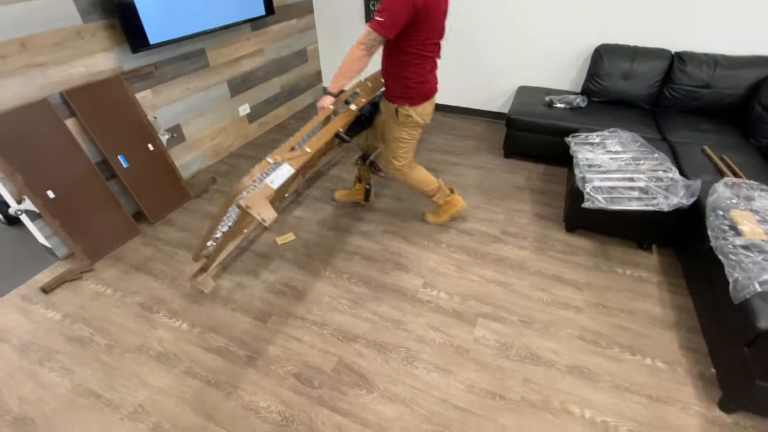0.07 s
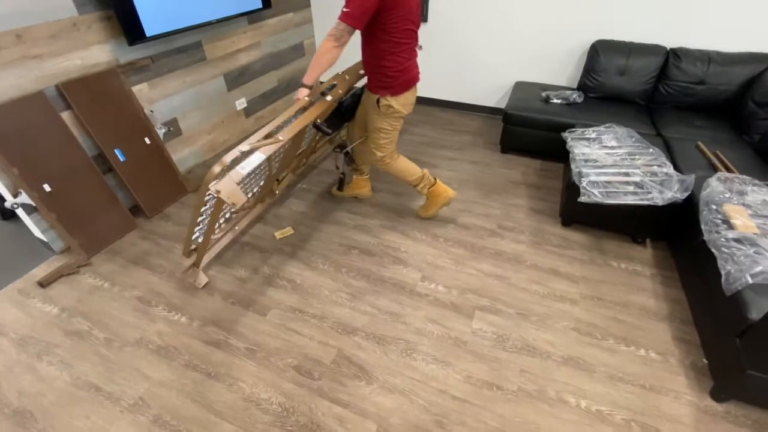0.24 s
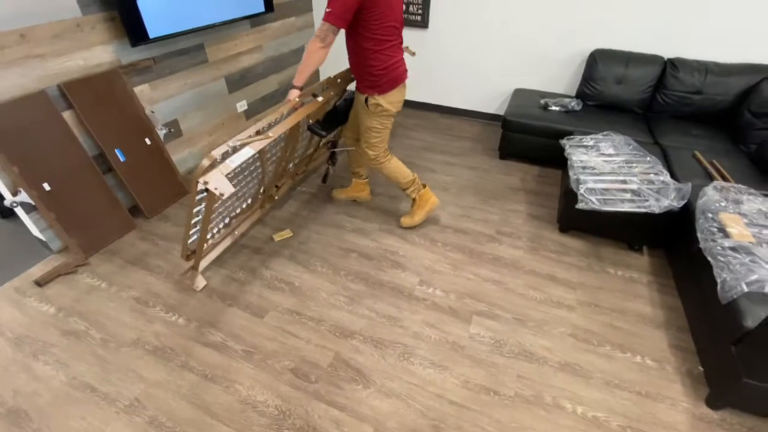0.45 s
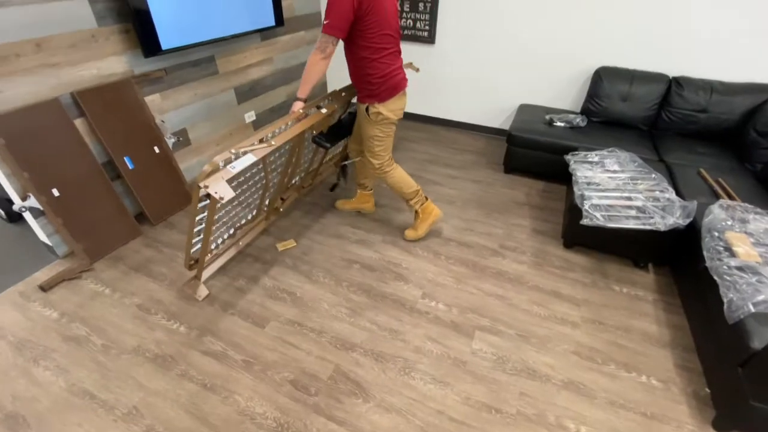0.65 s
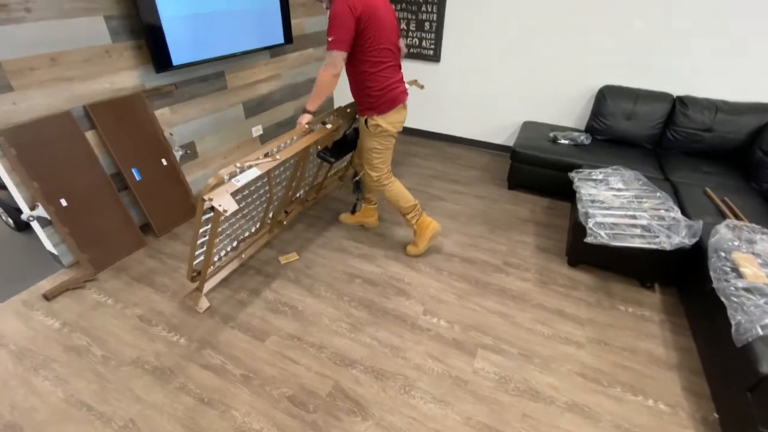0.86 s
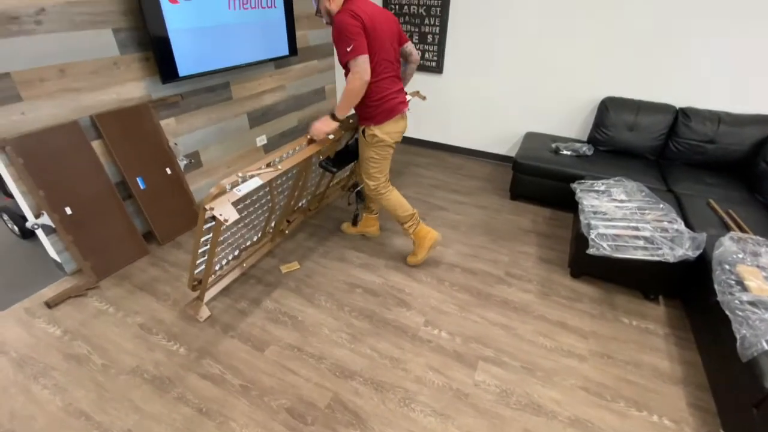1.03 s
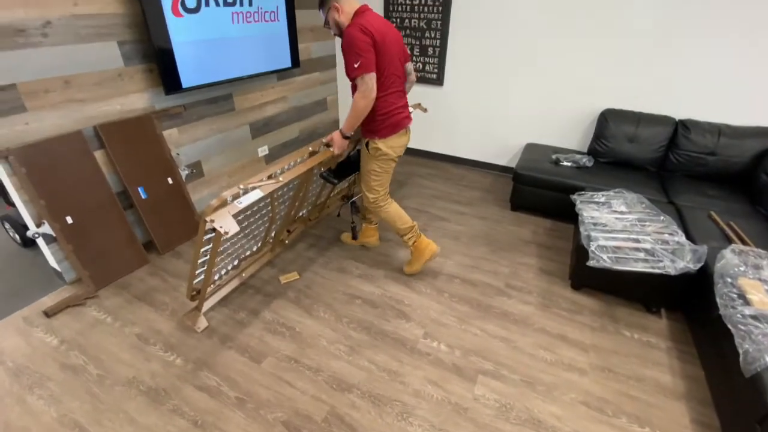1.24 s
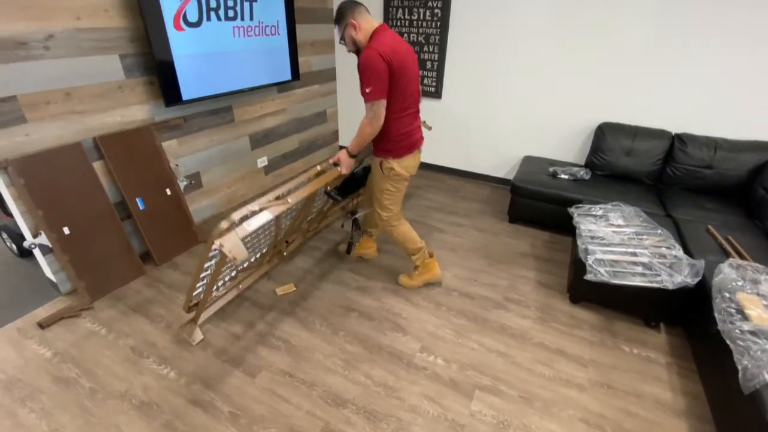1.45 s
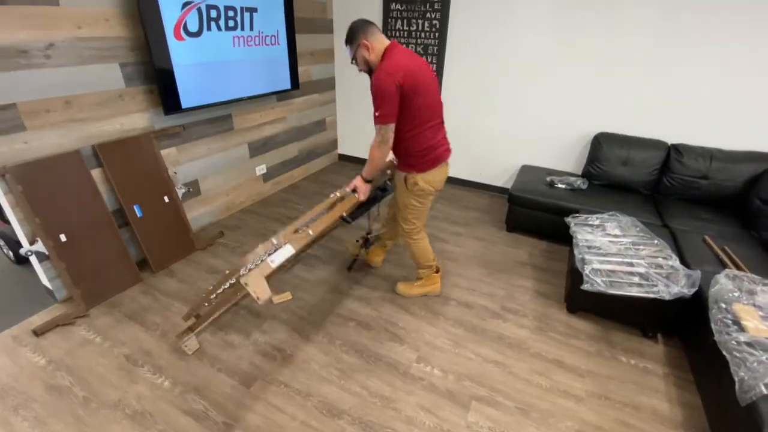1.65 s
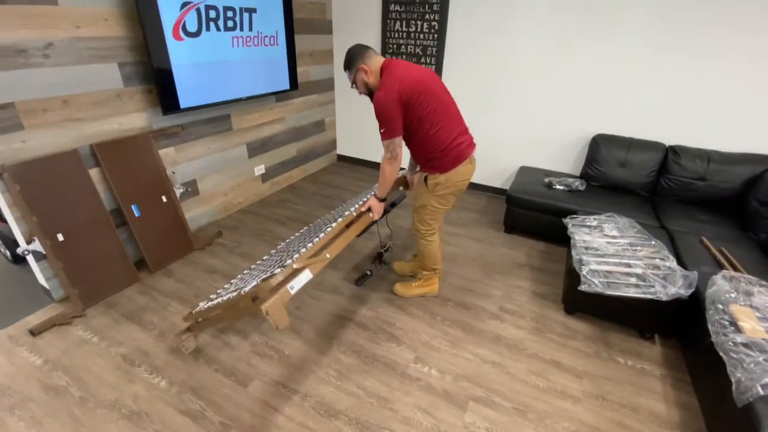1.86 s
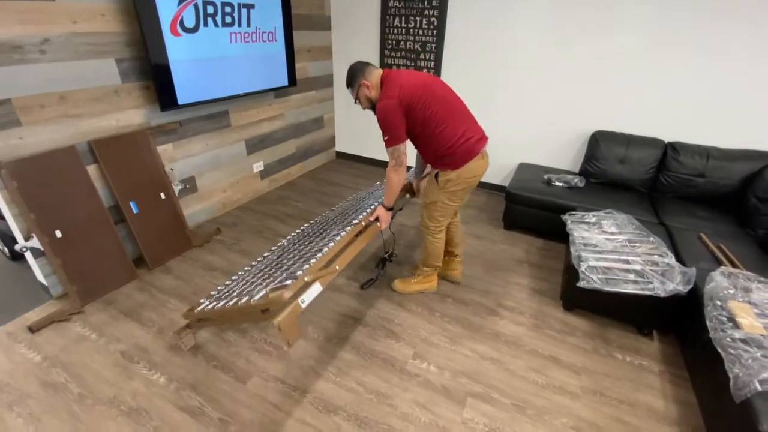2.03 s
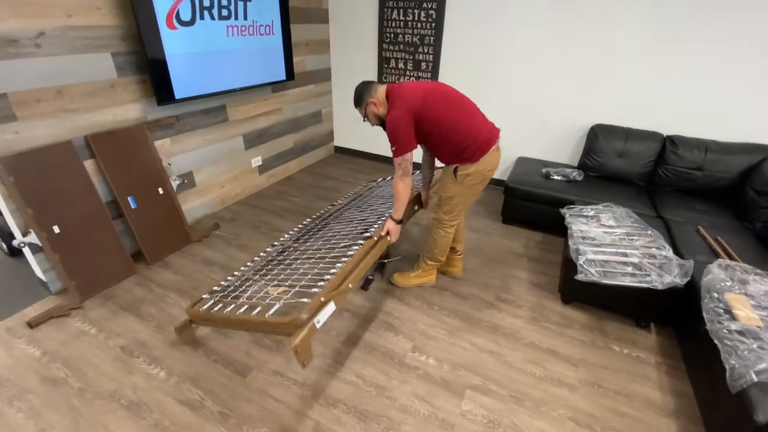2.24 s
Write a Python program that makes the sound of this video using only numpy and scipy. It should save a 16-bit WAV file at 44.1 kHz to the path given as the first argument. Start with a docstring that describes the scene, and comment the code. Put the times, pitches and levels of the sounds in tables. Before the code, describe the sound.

A metal bed frame clanks and its wire springs rattle as it is tipped and lowered.

```python
"""A metal bed frame with a wire spring deck is moved in a hard-floored room, over a ventilation rumble.
It is tipped up on its edge: loose parts clash in short bursts, ringing the steel tubes and the wire deck,
and dull knocks reach the floor. Around one second the deck rattles on softly. From about 1.4 s the frame
is lowered in a second run of clashes and knocks, and the rattle dies down.
Heard by a phone a few metres off."""
import sys
import numpy as np
from scipy import signal
from scipy.fft import rfft, irfft
from scipy.io import wavfile
from scipy.ndimage import uniform_filter1d

SR = 44100
rng = np.random.default_rng(int(sys.argv[2]) if len(sys.argv) > 2 else 0)


def materialize(psi):
    """Save the field psi as 16-bit PCM at rate SR to the path in sys.argv[1].

    A 1-D psi becomes a single channel; in a 2-D psi each row is a channel.
    """
    bounded = np.clip(np.atleast_2d(psi).T, -1, 1)
    quanta = np.round(bounded * 32767).astype(np.int16)
    wavfile.write(sys.argv[1], SR, quanta)


N = 101429
MOVE_S = .12  # the moving frame gets a new pattern of wire modes and echoes this often


def undb(db):
    """dB to gain."""
    return 10 ** (np.asarray(db) / 20)


def unit(x):
    """Scale to rms 1."""
    return x / np.sqrt(np.mean(x ** 2))


def colour(x, curve, tilt_db=0):
    """EQ by a (freq_hz, gain_db) curve, tilted by tilt_db per octave about 2.5 kHz."""
    hz = np.maximum(np.arange(len(x) // 2 + 1) * SR / len(x), 10)
    curve_hz, curve_db = np.array(curve).T
    gain_db = np.interp(np.log(hz), np.log(curve_hz), curve_db) + tilt_db * np.log2(hz / 2500)
    return irfft(rfft(x) * undb(gain_db), len(x))


def band(x, lo_hz, hi_hz):
    """Band-pass."""
    return signal.sosfilt(signal.butter(2, [lo_hz, hi_hz], "band", fs=SR, output="sos"), x)


def fade(t, t60):
    """Exponential decay, 60 dB in t60 seconds."""
    return np.exp(-np.log(1000) * t / t60)


def wander(per_s):
    """Slow random drift, rms 1."""
    step = int(SR / per_s)
    return unit(uniform_filter1d(np.repeat(rng.standard_normal(N // step + 1), step), step)[:N])


def add(out, x, start_s):
    """Mix x in at start_s."""
    i = int(start_s * SR)
    out[i:i + len(x)] += x[:N - i]


def positions():
    """Overlapping crossfades, one for each position of the moving frame."""
    t = np.arange(N) / SR
    return [np.clip(1 - abs(t - s) / MOVE_S, 0, 1) for s in np.arange(0, N / SR + MOVE_S, MOVE_S)]


# Tone of the ventilation: freq_hz, gain_db
VENT_EQ = [(15, -33), (25, -4), (81, -2.5), (137, -9), (250, -4), (433, -15), (658, -24.5), (731, -18),
           (1650, -29), (1830, -23.5), (2140, -32), (9750, -42.5), (13000, -48)]
# Its stereo width: freq_hz, side_over_mid_db
VENT_WIDTH = [(60, -14), (110, -7.5), (200, -12), (380, -2.5), (700, -0.5), (1290, -2), (2380, 6),
              (4400, -3), (8120, -2), (15000, 1)]


def ventilation():
    """Steady air rumble and room hush, leaning slightly right."""
    mid, side = (colour(band(rng.standard_normal(N), 44, 22000), VENT_EQ) for _ in range(2))
    side = colour(side, VENT_WIDTH)
    return undb(-56) / np.std(mid) * np.array([mid + side, mid - side]) * undb([[-1], [1]])


def room(x):
    """Diffuse echoes, mono in the bass, treble dying first; the pattern shifts as the frame moves."""
    out, t = np.zeros((2, N)), np.arange(SR * 3 // 4) / SR
    for crossfade in positions():
        send = x * crossfade ** 1.045
        noise = rng.standard_normal((3, len(t))) * (t > .003)  # 3 ms pre-delay
        bass = band(noise[0], 110, 460) * fade(t, t60=.28)
        for channel in range(2):
            mids = band(noise[channel + 1], 476, 3100) * fade(t, t60=.34)
            treble = band(noise[channel + 1], 4500, 20200) * fade(t, t60=.24)
            tail = bass + mids - treble
            out[channel] += signal.fftconvolve(send, tail / np.linalg.norm(tail))[:N]
    return undb(-1) * out


def contacts(size, per_s, spread):
    """Random metal-on-metal clicks, rms 1; more spread makes their sizes less even."""
    chance, polarity, strength = rng.random((3, size))
    return unit((chance < per_s / SR) * np.sign(polarity - .5) * undb(-spread * np.log(strength + .035)))


def wire_response():
    """The spring deck struck once: modes too close to count, evenly strong, dying fast."""
    t = np.arange(SR // 8) / SR
    spectrum = rfft(rng.standard_normal(len(t)) * fade(t, t60=.024))
    flattened = spectrum / np.sqrt(uniform_filter1d(abs(spectrum) ** 2, size=40))
    response = irfft(flattened, len(t))[:len(t) // 2]
    return response / np.linalg.norm(response)


# Ride of the rattle: time_s, level_db, brightness (-6 dull, 0 plain, 6 bright)
RATTLE_RIDE = [(0.0, -34, -5.5), (0.23, -34.5, -6), (0.38, -38, -3.5), (0.46, -42.5, -2),
               (0.59, -43.5, 4.5), (0.96, -58.5, 1.5), (1.05, -64.5, -2.5), (1.28, -55.5, -3.5),
               (1.39, -61.5, 0.5), (1.55, -42, -5.5), (1.77, -43.5, 0.5), (1.91, -44, -2),
               (1.98, -45, -1.5), (2.111, -47.5, -1), (2.16, -66, -2), (2.3, -60, -6)]
# Tone of the wire deck: freq_hz, gain_db
DECK_EQ = [(180, 1), (300, -3), (502, -7.5), (1300, -6.5), (3350, -10.5), (3830, -11.5), (6620, -15.5),
           (11900, -25), (15200, -48), (16000, -70)]
# Resonances of the deck: pitch_hz, width_hz (widened to at least 200), level_db
DECK_RESONANCES = [(870, 13, -17.5), (1277, 37, -1), (1436, 110, 1), (1870, 105, -3.5), (2200, 27, -25),
                   (2690, 31, -6), (2928, 340, 2), (3096, 340, 7.5), (4540, 53, 1.5), (5580, 37, -46),
                   (6605, 220, -7), (7420, 140, -5)]


def deck_rattle():
    """Links of the deck chatter into the wires and their resonances, duller or brighter as it moves."""
    chatter, rings = contacts(N, per_s=4000, spread=1.5), 0
    for hz, width_hz, db in DECK_RESONANCES:
        half_hz = max(width_hz, 200) / 2
        rings += undb(db + 3 * wander(per_s=15)) * unit(band(chatter, hz - half_hz, hz + half_hz))
    wires = sum(signal.fftconvolve(chatter * crossfade, wire_response())[:N] for crossfade in positions())
    dull, bright = (unit(colour(wires, DECK_EQ, tilt_db)) for tilt_db in (-6, 6))
    plain = unit(colour(wires, DECK_EQ)) + undb(-3) * unit(rings)
    t = np.arange(N) / SR
    time_s, level_db, brightness = np.array(RATTLE_RIDE).T
    blend = np.interp(t, time_s, brightness) / 6
    rattle = (1 - abs(blend)) * plain + np.maximum(blend, 0) * bright + np.maximum(-blend, 0) * dull
    return band(rattle, 346, 12750) * undb(np.interp(t, time_s, level_db))


# Small bright ticks at the opening: start_s, level_db
BRIGHT_TICKS = [(0.0194, -48), (0.029, -35), (0.0505, -59), (0.0508, -33)]


def ticks(pitch_hz=6740, width_hz=1400):
    """Tiny clicks: one high resonance, damped almost at once."""
    out, t = np.zeros(N), np.arange(SR // 2) / SR
    tick = np.sin(2 * np.pi * pitch_hz * t) * np.exp(-np.pi * width_hz * t)
    for start_s, db in BRIGHT_TICKS:
        add(out, undb(db) * tick, start_s)
    return out


# Thuds of the frame on the floor: start_s, level_db, pitch_hz, t60_s
FLOOR_KNOCKS = [(0.244, -36, 287, 0.039), (0.263, -39, 314, 0.089), (0.296, -27.5, 370, 0.03),
                (0.348, -42, 187, 0.081), (0.467, -28, 352, 0.052), (0.499, -36.5, 233, 0.067),
                (0.599, -37.5, 408, 0.072), (0.716, -31, 186, 0.069), (1.447, -40.5, 163, 0.12),
                (1.584, -69, 443, 0.048), (1.614, -29.5, 244, 0.07), (1.628, -27.5, 353, 0.046),
                (1.649, -38.5, 318, 0.1), (1.734, -34, 220, 0.033), (1.799, -46, 192, 0.056)]


def floor_knocks(attack_s=.0035):
    """Dull knocks reach the floor: a low tone with a noisy body and a soft attack."""
    out, t = np.zeros(N), np.arange(SR // 2) / SR
    for start_s, db, hz, t60 in FLOOR_KNOCKS:
        noise = unit(band(rng.standard_normal(len(t)), hz / 2, hz * 2))
        body = np.sin(2 * np.pi * hz * t) + undb(-7) * noise
        add(out, undb(db) * body * fade(t, t60) * (1 - np.exp(-t / attack_s)), start_s)
    return out


# Single parts ringing out: start_s, peak_db, pitch_hz, t60_s
PART_PINGS = [(.445, -30.5, 907, 0.07), (0.581, -34, 2690, 0.067), (0.584, -32, 1790, 0.087),
              (0.715, -21.5, 3086, 0.037), (0.728, -31, 3100, 0.065), (0.735, -26.5, 3220, 0.04),
              (0.772, -34, 3010, 0.039), (1.228, -44, 4760, 0.21), (1.229, -45.5, 6530, 0.048),
              (1.228, -47, 722, 0.17), (1.666, -25.5, 2985, 0.053), (1.745, -30, 3000, 0.15),
              (1.861, -36, 2735, 0.29), (1.955, -32, 3200, 0.17), (1.566, -43, 2470, 0.048),
              (1.584, -27.5, 815, 0.078), (1.583, -24.5, 2690, 0.034), (1.604, -21, 3100, 0.06),
              (1.612, -30, 1840, 0.047), (2.017, -34, 1304, 0.07), (2.036, -35, 1450, 0.074),
              (2.019, -36.5, 850, 0.22)]


def pings(mode_split=.035, shake_s=.001):
    """A brief shake rings one part: three close modes beat inside a narrow buzz."""
    out, t = np.zeros(N), np.arange(SR // 2) / SR
    for start_s, db, hz, t60 in PART_PINGS:
        modes = sum(gain * np.sin(2 * np.pi * hz * (1 + offset * mode_split) * t)
                    for offset, gain in ((.18, 1), (.63, .34), (-1.27, .1)))
        buzz = unit(band(rng.standard_normal(len(t)), hz * .92, hz * 1.08))
        ring = (modes + undb(-5) * buzz) * fade(t, t60)
        shake = rng.standard_normal(SR // 20) * np.exp(-t[:SR // 20] / shake_s)
        ping = band(signal.fftconvolve(ring, shake)[:len(t)], hz / 2, hz * 2)
        add(out, undb(db) * ping / abs(ping).max(), start_s)
    return out


# Sharp metal cracks: start_s, peak_db, tone_hz
METAL_CRACKS = [(.716, -28, 3140), (1.585, -22, 2600), (1.657, -22.5, 3350), (1.817, -36, 2550),
                (1.74, -36, 2800), (1.961, -42, 2980), (2.019, -27, 1660)]


def cracks():
    """Single hard contacts: a few milliseconds of broad noise."""
    out, t = np.zeros(N), np.arange(SR // 20) / SR
    for start_s, db, hz in METAL_CRACKS:
        snap = rng.standard_normal(len(t)) * fade(t, t60=.012)
        crack = band(band(snap, hz / 2, hz * 3), 650, 19000)
        add(out, undb(db) * crack / abs(crack).max(), start_s)
    return out


# Modes of the steel tubes: pitch_hz, level_db, t60_s (capped at max_t60_s)
TUBE_MODES = [(1949, -10, 0.12), (2062, -10, 0.08), (2207, -7, 0.07), (2600, -9, 0.22), (2837, 0, 0.043),
              (3768, -16, 0.35), (4360, -14, 0.59), (5039, -13, 0.27), (6718, -9, 0.14), (7424, -18, 0.22),
              (8742, -8, 0.05), (9835, -12, 0.25), (10250, -13, 0.095), (10600, -28, 0.36),
              (11540, -17, 0.17), (12130, -5, 0.12), (14550, -22, 0.17)]
# Hard blows on the tubes: start_s, level_db, shake_decay_s
TUBE_HITS = [(.243, -24, 0.039), (.267, -33, 0.072), (.57, -38.5, 0.0038), (1.584, -38, 0.013),
             (1.656, -48, 0.024)]


def tubes(max_t60_s=.16, scatter_db=2):
    """Blows shake the steel tubes, which ring briefly on their modes."""
    out, t = np.zeros(N), np.arange(SR // 2) / SR
    for start_s, db, shake_s in TUBE_HITS:
        ring = 0
        for hz, mode_db, t60 in TUBE_MODES:
            scatter = rng.standard_normal()  # varies level and phase from blow to blow
            mode = np.cos(2 * np.pi * hz * t + 9 * scatter) * fade(t, min(t60, max_t60_s))
            ring += undb(mode_db + scatter_db * scatter) * mode
        shake = rng.standard_normal(len(t)) * np.exp(-t / shake_s)
        add(out, undb(db) * signal.fftconvolve(shake / np.linalg.norm(shake), ring)[:len(t)], start_s)
    return out


# Borders of the five clash bands: edge_hz
CLASH_EDGES_HZ = [500, 1200, 2500, 5000, 8000, 16000]
# Loose parts clashing: start_s, level_db, five band_db (low to high), hold_s, mid_band_t60_s, strike_db
PART_CLASHES = [(0.004, -38.5, -10, -12, -21, -16, -29, 0.005, 0.086, 1),
                (0.083, -50, -16, 1, -12, -23, -20, 0.0086, 0.13, -3),
                (0.158, -38, -13.5, -14, -11, -23, -23, 0.0072, 0.08, -4),
                (0.18, -36, -11.5, -16, -9, -22, -19, 0.032, 0.51, -5.5),
                (0.235, -22.5, -19, -12.5, -4.5, -7, -6.5, 0.014, 0.18, -12),
                (0.245, -17.5, -33, -8, -22, -10, -15, 0.015, 0.12, -1),
                (0.267, -25, -22, -36, -1.5, -12, -11, 0.016, 0.26, -2),
                (0.445, -32, -5.5, -23, -16, -31, -20.5, 0.016, 0.13, -5),
                (0.469, -36.5, -29, -16, -5.5, -24, -6.5, 0.046, 0.72, -2),
                (0.569, -25.5, -16, -17.5, -8.5, -8.5, -18, 0.0082, 0.074, -0.5),
                (0.588, -26.5, -22, -18, -7, -39, -14, 0.0066, 0.12, -11),
                (0.716, -38.5, -25, -2.5, 0.5, -10, -11, 0.0044, 0.11, 1),
                (0.772, -47.5, -10, -41, -39, -28, -29, 0.01, 0.17, -4),
                (1.228, -40, -9.5, -2, -15, -13, -21, 0.014, 0.2, 4),
                (1.409, -61, -12, -23, -22, -20, -7, 0.007, 0.11, -3),
                (1.44, -50, -13, -21, -24, -11, -4.5, 0.0068, 0.099, 0),
                (1.45, -44, -27, -7, -1, -37, -14, 0.0085, 0.16, 2),
                (1.508, -44, -11, -9, -14, -33, -24, 0.0074, 0.057, -5),
                (1.583, -28, -12, -7, -8.5, -7, -15.5, 0.0062, 0.12, -4.5),
                (1.602, -34.5, -24, -6.5, -0.5, -9, -8, 0.0069, 0.21, -5),
                (1.657, -28.5, -21, -10.5, -7.5, -12.5, -12.5, 0.0036, 0.15, 0.5),
                (1.735, -32.5, -26, -8, -6.5, -15, -13, 0.0053, 0.06, -2),
                (1.769, -39, -15, -24, -13, -17, -18, 0.0026, 0.023, 5),
                (1.814, -32, -12, -11, -11, -28, -14, 0.0052, 0.12, -9),
                (1.859, -36.5, -14, -2.5, -10, -10, -17, 0.0084, 0.42, -1),
                (1.96, -37, -45, -3, -7, -10.5, -17, 0.016, 0.06, 1),
                (2.019, -34.5, -23, -0.5, -22, -13, -14, 0.016, 0.066, 0),
                (2.035, -39, -16.5, -3, 1, -4, -4, 0.0024, 0.16, 6)]


def clashes(attack_s=.0012, trim_db=-4.5):
    """Loose parts strike once, then a burst of contacts rings the wires; higher bands die sooner."""
    out, t = np.zeros(N), np.arange(SR // 2) / SR
    for start_s, db, *bands_db, hold_s, mid_t60, strike_db in PART_CLASHES:
        burst = contacts(len(t), per_s=6000, spread=2) * (1 - np.exp(-t / attack_s))
        strike = 2 * undb(strike_db) * rng.standard_normal(len(t)) * fade(t, t60=.0086)
        deck, clash = wire_response(), 0
        since_hold = np.maximum(t - hold_s, 0)
        for k, (band_db, lo, hi) in enumerate(zip(bands_db, CLASH_EDGES_HZ, CLASH_EDGES_HZ[1:])):
            release = fade(since_hold, mid_t60 * .75 ** (k - 2))
            wires = signal.fftconvolve(burst * release, deck)[:len(t)]
            gain = undb(band_db) * np.sqrt(SR / 2 / (hi - lo))  # made up for the band's width
            clash += (-1) ** k * gain * band(wires + strike, lo, hi)  # flips keep the seams filled
        add(out, undb(db + trim_db) * clash, start_s)
    return out


# Phase between the phone's two microphone ports: freq_hz, right_lag_rad
PORT_LAG = [(0, 0), (1030, 1.2), (2240, 0.9), (3190, 1.9), (3960, -1.4), (5770, -1.7), (7580, 2.5),
            (8700, 1.2), (9730, -6.2), (11700, -6.2), (12500, -9.2), (14300, -9.5), (15000, -12.6),
            (16000, -12.5)]
# Balance between the ports: freq_hz, left_over_right_db
PORT_PAN = [(60, 9), (110, -6), (200, 0), (380, -3.5), (700, 1.5), (1290, 2), (2380, -6), (4400, 5.5),
            (8120, 4), (15000, -5.5)]


def direct_sound(frame):
    """The frame reaches the two ports with a phase and balance that vary with frequency."""
    hz = np.arange(N // 2 + 1) * SR / N
    lag_rad = np.interp(hz, *np.array(PORT_LAG).T)
    right = irfft(rfft(frame) * np.exp(-1j * lag_rad), N)
    left_eq, right_eq = np.array(PORT_PAN) * [1, .5], np.array(PORT_PAN) * [1, -.5]
    return np.array([colour(frame, left_eq), colour(right, right_eq)])


def scene():
    """The frame in stereo, with its echoes and the ventilation."""
    drier = tubes() + pings() + floor_knocks() + ticks()
    wetter = clashes() + cracks() + deck_rattle()
    return direct_sound(drier + wetter) + room(wetter + undb(-7) * drier) + ventilation()


def record(dry, shelf_hz=12450, shelf_db=-24, cutoff_hz=16000):
    """Treble drops steeply above 12.5 kHz and is cut off at 16 kHz."""
    low = signal.sosfiltfilt(signal.ellip(8, .1, 40, shelf_hz, fs=SR, output="sos"), dry)
    shelved = low + undb(shelf_db) * (dry - low)
    return signal.sosfilt(signal.ellip(10, .2, 80, cutoff_hz, fs=SR, output="sos"), shelved)


dry = scene()
out = record(dry)
materialize(out)
```